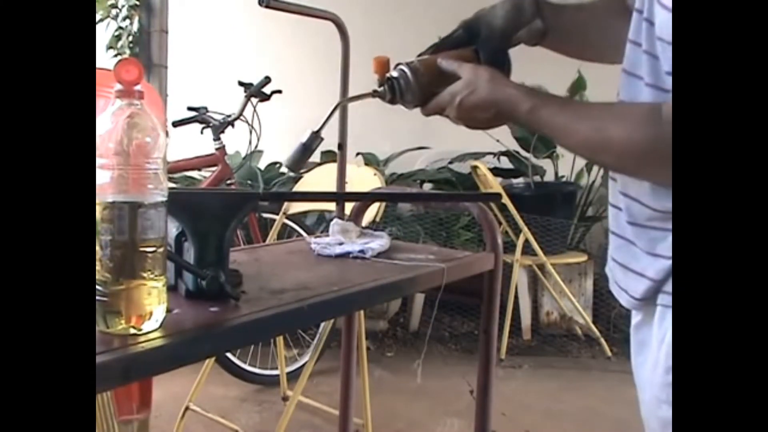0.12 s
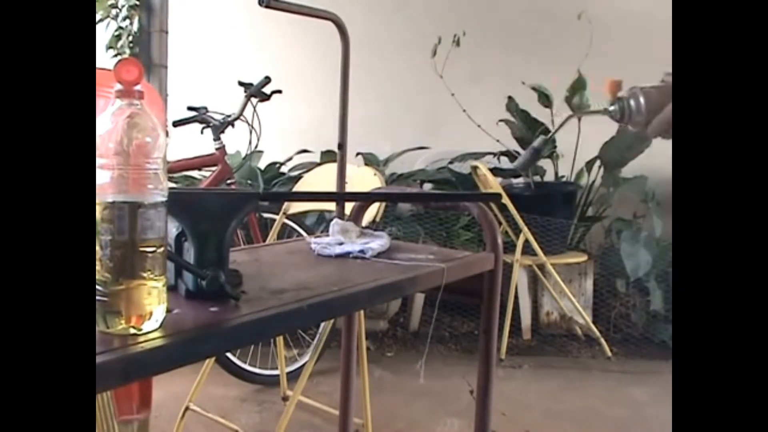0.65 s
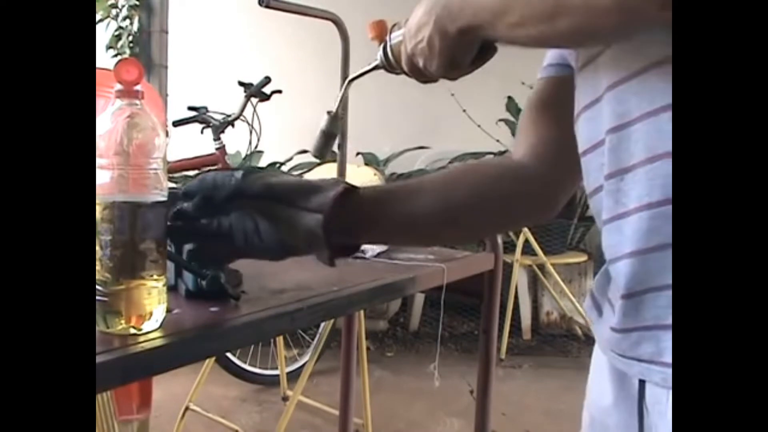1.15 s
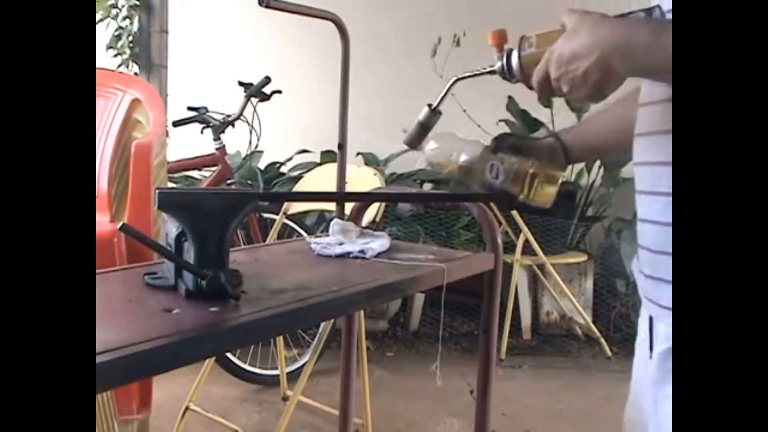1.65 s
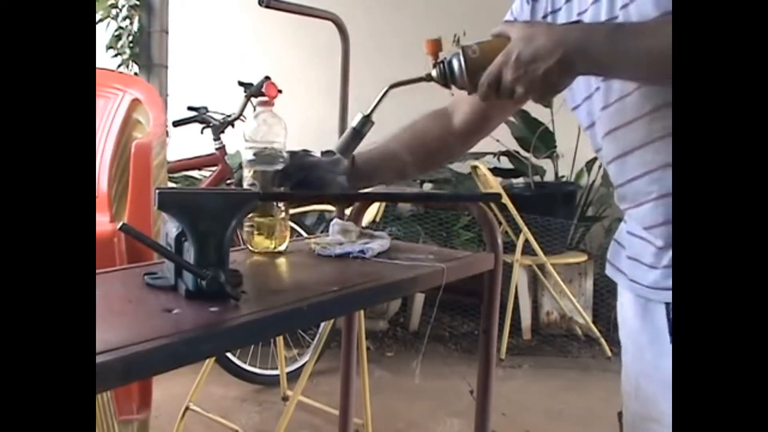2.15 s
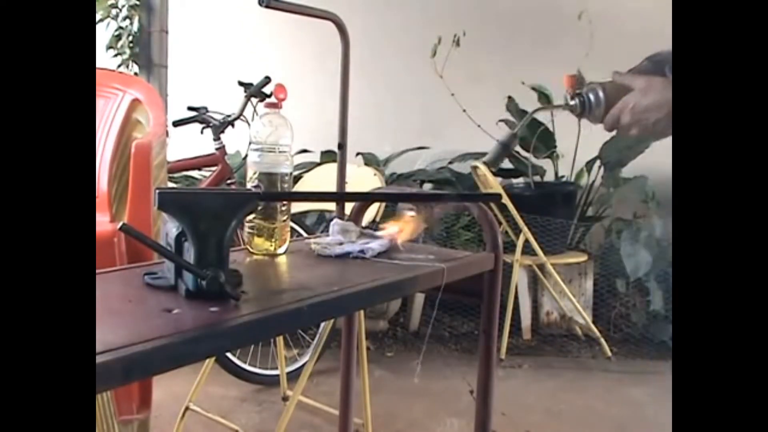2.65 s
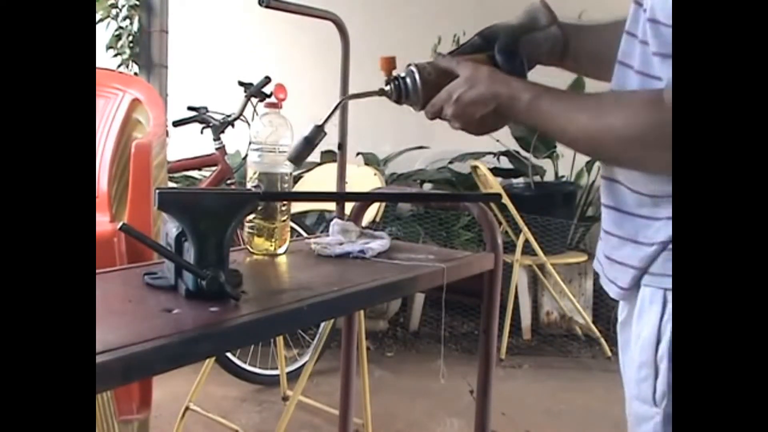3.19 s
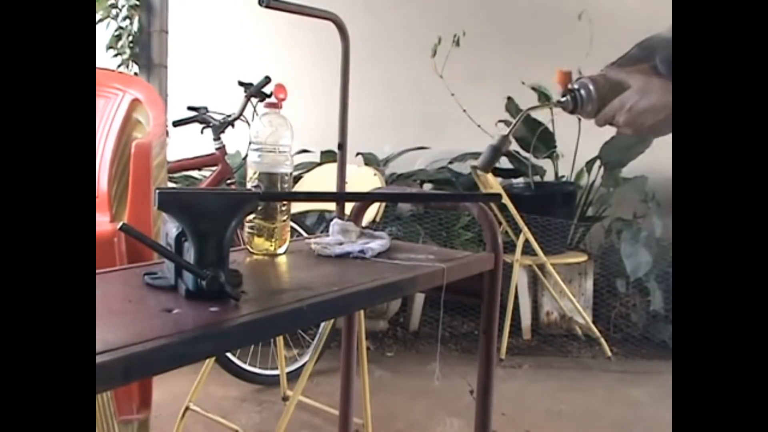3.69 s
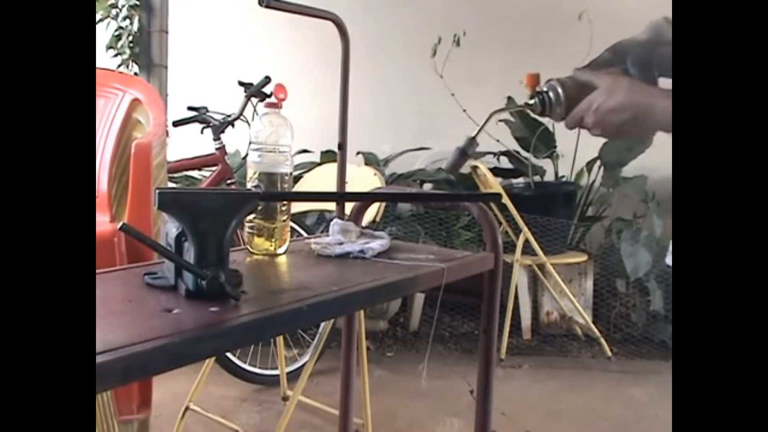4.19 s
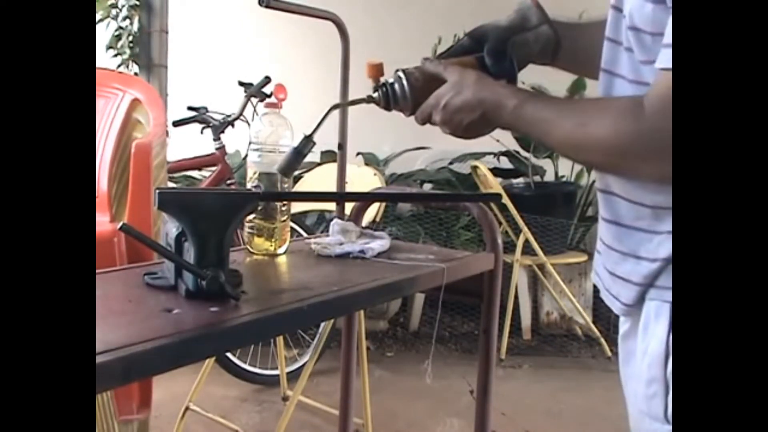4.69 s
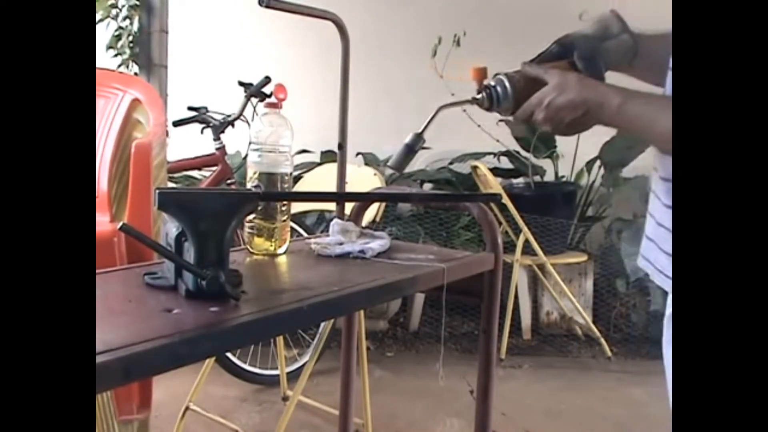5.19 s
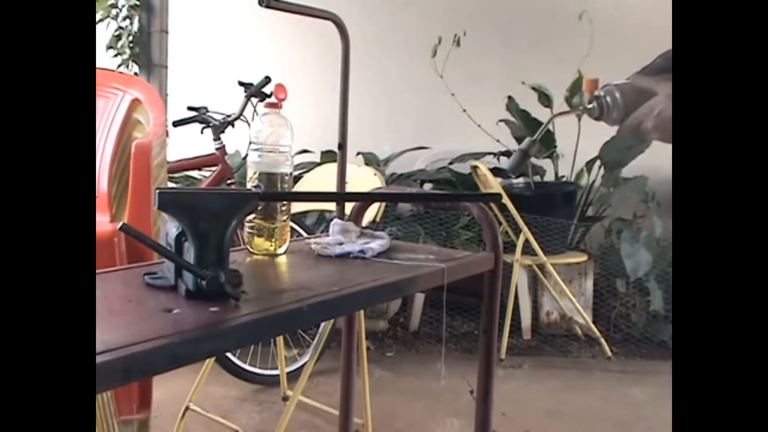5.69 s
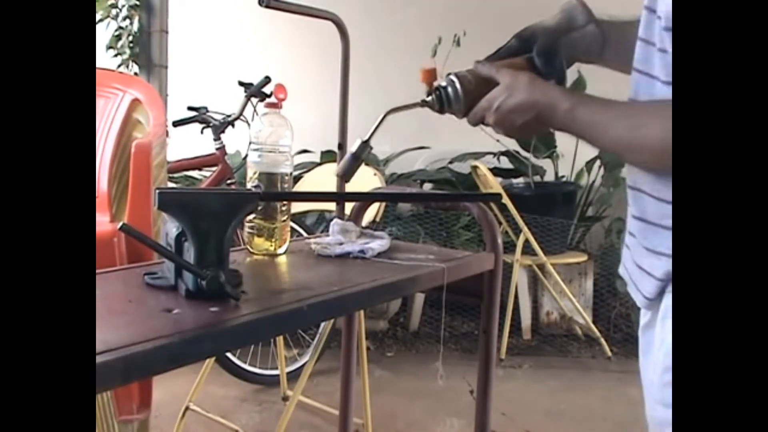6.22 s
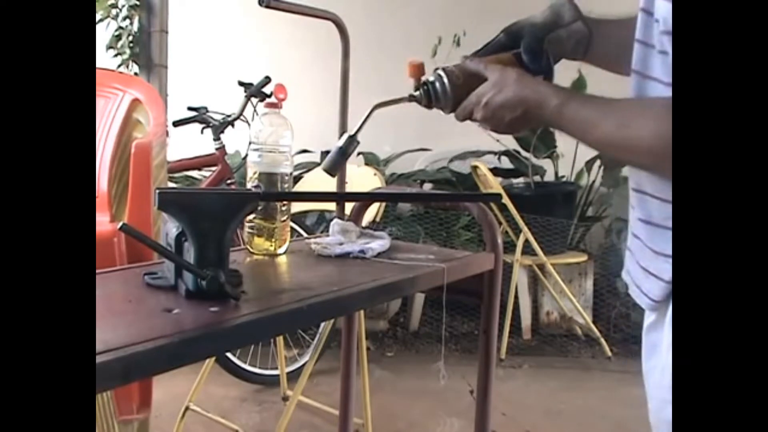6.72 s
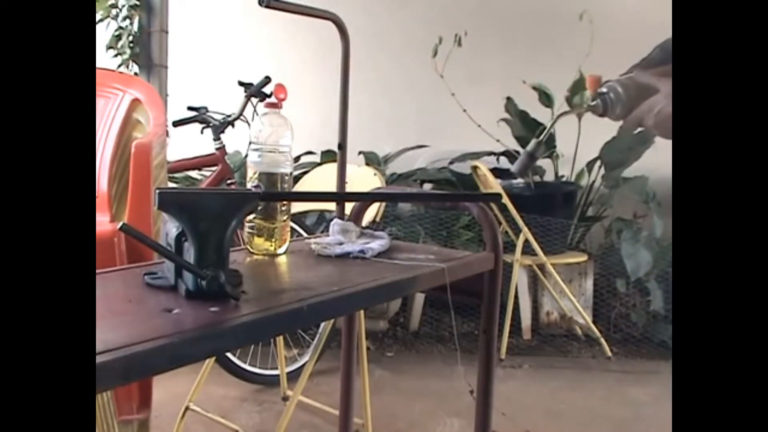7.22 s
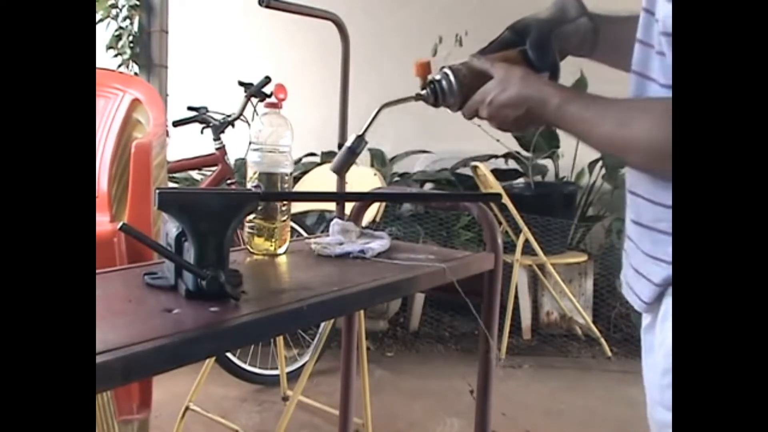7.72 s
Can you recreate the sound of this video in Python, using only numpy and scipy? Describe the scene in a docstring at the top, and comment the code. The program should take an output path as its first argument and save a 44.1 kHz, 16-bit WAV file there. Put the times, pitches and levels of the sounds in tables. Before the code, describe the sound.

Close, steady burner roar with a sliding, hollow whooshing colour, a few early flame puffs, faint passing traffic and a low rush at the end.

```python
"""A handheld gas torch roars and hisses, swept to and fro along a steel rod over a table on a covered porch.
The jet is turbulent noise combed by many short echoes whose delays slide with the hand. Early on the flame
sputters in soft low puffs, twice faltering, and an arm screens some echoes at 1.3 s; the flame flares at times.
From 3.5 s far motor tones hum over low traffic noise, and a vehicle passes near 5.3 s as swelling noise.
At the end the flame flares, gives a steady low whoosh of noise and sputters again."""
import sys
import numpy as np
from scipy import signal
from scipy.io import wavfile

SR = 44100
rng = np.random.default_rng(int(sys.argv[2]) if len(sys.argv) > 2 else 0)


def master(y):
    """Save y as 16-bit WAV."""
    cut = np.clip(np.atleast_2d(y).T, -1, 1)
    pcm = np.round(cut * 32767)  # scale
    wavfile.write(sys.argv[1], SR, pcm.astype(np.int16))


def boost_factor(decibels):
    """Convert a level in decibels to a linear amplitude factor."""
    exponent = np.asarray(decibels, float) / 20
    return 10 ** exponent


N = 346626   # samples


def rms_one(x):
    """Normalization: equal mean power gives every signal an rms of 1."""
    return x / np.sqrt(np.mean(x ** 2) + 1e-20)


def at_hz(points, hz):
    """Logarithmic frequency scale: a spectrum table is interpolated evenly per octave."""
    table_hz, value = np.array(points).T
    return np.interp(np.log(hz), np.log(table_hz), value)


def drift(rate_hz):
    """Low-pass filtered chance: white noise twice through one pole wanders slowly, with rms 1."""
    pole = np.exp(-2 * np.pi * rate_hz / SR)
    white = rng.standard_normal(N + SR)
    settled = signal.lfilter([1], [1, -2 * pole, pole * pole], white)[SR:]
    return rms_one(settled)


def band(x, low_hz, high_hz):
    """Band limitation: a Butterworth filter passes one range of frequencies."""
    return signal.sosfilt(signal.butter(2, [low_hz, high_hz], "band", fs=SR, output="sos"), x)


def low_noise(own_db, top_hz):
    """Partial coherence: both ports share one deep and one broad noise, each adding its own at own_db."""
    white = rng.standard_normal((2, 3, N))
    shared, own = white[:, :1], white[:, 1:]
    deep_white, broad_white = shared + boost_factor(own_db) * own
    deep = rms_one(band(band(deep_white, 99, 227), 85, 330))
    broad = rms_one(band(broad_white, 190, top_hz))
    return deep, broad


def motor_tones():
    """Periodic excitation: far motors give sine tones whose pitch glides and wobbles and whose level wavers."""
    # Each row: start and end in seconds, first and last frequency in Hz, middle level in dB.
    tones = [(3.5, 4.45, 231, 232, -47), (4.75, 5.8, 168, 201, -42.5), (5.403, 5.8, 204, 223, -41),
             (6.35, 7.0, 184, 191.5, -47.5)]
    s, out = np.arange(N) / SR, 0
    waver_db = 3.0 * drift(7.0)
    wobble = 1 + .012 * drift(12.0)
    for start, end, first_hz, last_hz, db in tones:
        hz = np.interp(s, [start, end], [first_hz, last_hz])
        phase = 2 * np.pi * np.cumsum(hz * wobble) / SR
        fade = np.clip(np.minimum(s - start, end - s) / 0.15, 0, 1)
        out = out + fade * boost_factor(db + waver_db) * np.sqrt(2) * np.sin(phase)
    return out


def traffic():
    """Spreading loss: a passing vehicle's noise swells and fades with distance over a steady far rumble."""
    s = np.arange(N) / SR
    deep, broad = low_noise(own_db=-13.0, top_hz=520)
    # each width is in seconds: nearest distance over speed
    engine = boost_factor(-39) / np.hypot(1, (s - 5.3) / .3)
    tyres = boost_factor(-33) / (1 + ((s - 5.58) / 0.36) ** 2)
    rumble = np.hypot(boost_factor(-56.5), engine)
    waver = boost_factor(1.5 * drift(3.6))
    return motor_tones() + rumble * waver * deep + tyres * broad


def whoosh():
    """Turbulent combustion noise: a low rush of the flame sets in quickly and holds."""
    onset_s, rise_s = 7.7, .03
    deep, broad = low_noise(own_db=0.0, top_hz=1300)
    rise = .5 + .5 * np.tanh((np.arange(N) / SR - onset_s) / rise_s)
    return rise * (boost_factor(-36) * deep + boost_factor(-27) * broad)


def sputters(cycles=1.53, breath_db=-7.5, breath_s=0.016):
    """Pulsed heat release: each sputter is a pressure puff, a few cycles long, inside a short low gust."""
    # Each row: start in seconds, strength in dB before envelope and filter, frequency in Hz.
    puff_rows = [(0.107, -27, 291), (1.245, -27, 223), (1.36, -19.5, 260), (1.392, -30, 231),
                 (1.424, -22, 231), (1.469, -27, 302), (1.83, -21.5, 280), (2.059, -23.5, 326),
                 (2.272, -23, 274), (2.34, -23, 226), (2.494, -19, 266), (2.518, -25, 250),
                 (2.673, -19, 218), (2.724, -18.5, 291), (3.307, -22, 290), (3.354, -23, 219),
                 (3.384, -20, 323), (7.695, -21, 270), (7.747, -17, 274), (7.79, -19, 244),
                 (7.843, -22, 256)]
    puffs, gusts = np.zeros(N + SR), np.zeros(N + SR)
    s = np.arange(SR // 10) / SR
    for at, db, hz in puff_rows:
        start = round(at * SR)
        age = s * hz / cycles
        envelope = age * np.exp(1 - age) ** 2
        puffs[start:][:len(s)] += boost_factor(db) * envelope * np.sin(2 * np.pi * hz * s)
        gusts[start:][:len(s)] += boost_factor(db + breath_db) * np.exp(-s / breath_s)
    breath = rms_one(band(band(rng.standard_normal(N), 180, 630), 145, 900))
    return band(puffs[:N], 194, 900) + gusts[:N] * breath


def hand(s):
    """Kinematics: cosine-eased strokes join the turning points, each rising in an arc between them."""
    # Each row: time in seconds, place along the rod from 0 near to 1 far, lift above the usual path (relative).
    turning_points = [(-0.2, 0.65, -0.2), (0.29, 0.02, -0.69), (0.76, 0.86, 0.21), (1.28, 0.079, -0.26),
                      (1.9, 0.63, 1.33), (2.32, 0.085, -0.16), (2.8, 0.87, -0.0017), (3.21, 0.19, -0.27),
                      (3.92, 0.92, -0.057), (4.78, 0.18, -0.72), (5.73, 0.91, -0.02), (6.55, 0.16, -0.78),
                      (7.25, 0.9, -0.0056), (7.85, 0.23, -0.57)]
    at, along, lift = np.transpose(turning_points)
    order = np.arange(len(at))
    stroke = np.interp(s, at, order)
    eased = np.floor(stroke) + .5 - .5 * np.cos(np.pi * (stroke % 1))
    arc = 0.57 * np.sin(np.pi * stroke) ** 2
    return np.interp(eased, order, along), np.interp(eased, order, lift) + arc


def clutter(count, strength):
    """Scattering: clutter returns faint treble echoes at random delays that slide far with the hand."""
    draw = rng.uniform(-1, 1, (count, 5))
    delay_ms = 5.5 + 4.5 * draw[:, 0]
    along_ms = .3 * draw[:, 1] + .2 * np.sign(draw[:, 1])
    lift_ms = .15 * draw[:, 2]
    signed_strength = strength * np.sign(draw[:, 3])
    best_hz = 8000 * 2 ** draw[:, 4]
    return np.c_[delay_ms, along_ms, lift_ms, signed_strength, best_hz]


def echo_sum(rows, hz, along, lift):
    """Comb filtering: delayed copies add by phase, with delays renewed from the hand every second frame."""
    spread_octaves = .6   # of the band that one surface reflects
    total = 0
    for delay_ms, along_ms, lift_ms, strength, best_hz in rows:
        path_ms = delay_ms + along_ms * along[::2] + lift_ms * lift[::2]
        cycles = np.outer(hz, path_ms) / 1000
        size = strength * np.exp(-.5 * (np.log2(hz / best_hz) / spread_octaves) ** 2)
        total = total + size[:, None] * np.exp(-2j * np.pi * cycles.astype(np.float32))
    return np.repeat(total, 2, axis=1)[:, :len(along)]


def reflections(hz, s, along, lift):
    """Multiple reflection: the exponential of the echo sum lets each echo be echoed again by the others."""
    # Echoes off table, rod, arms and walls. Each row: delay in ms, its change along the rod in ms,
    # its change per unit of lift in ms, signed strength before screening, frequency reflected best in Hz.
    surfaces = [(0.221, 0.2, -0.01, -0.16, 3200), (0.374, -0.037, -0.01, -0.1, 13000),
                (0.38, 0.063, 0.015, -0.12, 8500), (0.663, -0.087, 0.027, 0.25, 8500),
                (0.737, -0.062, 0.052, -0.07, 13000), (0.828, -0.1, 0.002, 0.11, 8500),
                (0.924, -0.225, 0.015, -0.28, 3200), (0.935, -0.15, 0.027, -0.07, 8500),
                (0.998, -0.037, 0.015, -0.08, 8500), (1.128, -0.4, 0.102, -0.14, 1800),
                (1.151, -0.037, -0.023, 0.15, 8500), (1.434, -0.062, -0.01, -0.16, 1800),
                (1.604, -0.05, -0.023, 0.08, 8500), (1.746, -0.025, -0.01, 0.12, 8500),
                (2.001, -0.087, 0.015, 0.11, 5500), (2.035, -0.237, 0.052, 0.11, 3200),
                (2.256, -0.05, 0.002, 0.36, 1800), (2.279, -0.062, -0.023, -0.12, 5500),
                (2.534, -0.137, 0.027, 0.09, 8500), (2.778, -0.162, 0.052, 0.13, 1800),
                (3.265, -0.012, 0.027, -0.12, 3200), (3.617, -0.3, 0.027, 0.09, 3200),
                (3.821, 0.113, -0.023, -0.15, 1800), (3.917, -0.4, -0.023, 0.21, 600),
                (4.541, -0.025, 0.015, -0.09, 3200), (4.921, -0.025, -0.01, 0.29, 1000),
                (6.117, -0.212, 0.027, -0.07, 5500), (6.587, -0.162, 0.002, -0.36, 1000),
                (7.55, 0.0, 0.0, 0.25, 520), (7.687, -0.125, -0.01, 0.11, 1800),
                (9.558, -0.325, -0.048, 0.14, 1000)]
    # an arm reaches across the table and screens a share of the echoes
    open_view = 1 - 0.19 * np.exp(-((s - 1.3) / 0.22) ** 4)
    rows = np.r_[surfaces, clutter(count=14, strength=.115)]
    echoes = np.exp(open_view * echo_sum(rows, hz, along, lift))
    # the hands shade part of the direct path, so the spectral hollows cut deeper
    shade = np.interp(along, [0, 1], [.15, .33])
    return echoes - shade


def flame_db(s, along):
    """Superposed level changes: pressure, distance and flares add in dB to roar, hiss and sizzle."""
    # The next four tables hold one value each for roar, hiss and sizzle.
    # Level in dB at the start, at mid-rod and without a flare.
    base_db = [-16, -17.5, -14.5]
    # Slow trend in dB per second as the canister's pressure falls.
    pressure_db_per_s = [0.08, 0.0841, -0.34]
    # Change in dB from the near to the far end of the sweep.
    distance_db = [-0.2, -1.5, 0.5]
    # Change in dB in a flare of strength 1: the roar grows and the sizzle sinks.
    full_flare_db = [1.55, 0.1, -2]
    # Each row: middle of a flare in seconds, strength (relative), half length in seconds.
    flare_rows = [(1.14, 1.0, .1), (1.42, 1.1, 0.099), (2.3, 0.36, 0.18), (3.17, 0.61, 0.11), (6.3, .9, .2),
                  (7.338, 1.4, 0.11), (7.754, 1.4, 0.11)]
    flare = sum(size * np.exp(-((s - at) / half) ** 2) for at, size, half in flare_rows)
    trend = np.outer(pressure_db_per_s, s) + np.outer(distance_db, along - .5)
    return np.c_[base_db] + trend + np.outer(full_flare_db, flare)


def flame_gain(hz, s, along, power):
    """Band power control: gains bring roar, hiss and sizzle to their levels, blended across frequency."""
    # Each row: lower and upper edge in Hz, for roar, hiss and sizzle.
    flame_ranges = [(600, 2200), (2500, 7000), (9000, 15500)]
    short_db = []
    for db, (low, high) in zip(flame_db(s, along), flame_ranges):
        band_power = power[(hz > low) & (hz < high)].sum(axis=0)
        short_db.append(db - 10 * np.log10(band_power))
    centres_hz = np.sqrt(np.prod(flame_ranges, axis=1))
    share = [at_hz(list(zip(centres_hz, row)), hz) for row in np.eye(len(flame_ranges))]
    return boost_factor(np.transpose(share) @ short_db)


def port_balance(hz, along, far_pan_db=-2.5):
    """Interaural-style cues: level and phase differences, returned as half of the left-to-right ratio."""
    # Each row: frequency in Hz, left minus right level in dB at mid-rod.
    balance = [(30, -5), (60, -2), (150, 1), (380, 1.5), (950, 0), (2380, -4), (5980, -3.0), (15000, -3.0)]
    # Each row: frequency in Hz, phase in radians by which the left leads.
    phase_lead = [(0, 0), (690, -0.63), (1290, -0.78), (3190, -0.95), (5170, -0.24), (5860, -0.44),
                  (7240, -0.8), (15300, -0.2)]
    # above 1500 Hz the jet moves to the right towards the far end of the sweep
    pan_db = at_hz(balance, hz)[:, None] + far_pan_db * (along - .5) * (hz[:, None] > 1500)
    return boost_factor(pan_db / 2) * np.exp(.5j * at_hz(phase_lead, hz))[:, None]


def jet():
    """Turbulent mixing noise, coloured frame by frame: one direct sound in both ports, a diffuse part in each."""
    # Each row: frequency in Hz, relative level in dB per Hz before the flame gains.
    jet_colour = [(25, -32), (60, -32.5), (110, -33), (150, -28), (250, -12.5), (360, -9.5), (450, -17),
                  (600, -7), (800, -3), (1200, -1), (1900, -.5), (2200, -6), (3300, -7), (4600, -3.5),
                  (5200, -7.5), (6000, -12.5), (8000, -10.5), (10000, -13.5), (12000, -6.5), (13800, -2),
                  (15500, -13)]
    # Each row: frequency in Hz, diffuse level in dB against the direct sound where the echoes have gain 1.
    diffuse_db = [(50, -3), (125, -11), (250, -12), (450, -15), (700, -14), (1200, -5), (2500, -11),
                  (6000, -13), (14000, -14)]
    frame, hop = 2048, 512   # samples
    noise = rng.standard_normal((3, N))
    hz, s, (direct, *diffuse) = signal.stft(noise, SR, nperseg=frame, noverlap=frame - hop)
    hz[0] = 1   # keeps the logarithm finite
    along, lift = hand(s)
    echoes = reflections(hz, s, along, lift)
    colour = boost_factor(at_hz(jet_colour, hz))[:, None]
    spread = boost_factor(at_hz(diffuse_db, hz))[:, None] * np.abs(echoes) ** 0.73
    power = colour ** 2 * (np.abs(echoes) ** 2 + spread ** 2 / 2) * 2 / frame
    colour = colour * flame_gain(hz, s, along, power)
    half = port_balance(hz, along)
    ports = []
    for side, own in zip((half, 1 / half), diffuse):
        own_clutter = np.exp(echo_sum(clutter(count=6, strength=.12), hz, along, lift))
        ports.append(colour * side * (echoes * own_clutter * direct + spread * own))
    return signal.istft(np.array(ports), SR, nperseg=frame, noverlap=frame - hop)[1][:, :N]


def unsteady_flow(slow_db=0.34, fast_db=.5):
    """Amplitude modulation: the gas flow flutters a little and falters for a few milliseconds at times."""
    # Each row: middle in seconds, level change in dB, half length in seconds.
    dips = [(1.137, -3, .005), (1.379, -5.5, .007)]
    s = np.arange(N) / SR
    dips_db = sum(db * np.exp(-((s - at) / half) ** 4) for at, db, half in dips)
    return boost_factor(slow_db * drift(12.3) + fast_db * drift(27.0) + dips_db)


def scene():
    """Linear superposition of jet, sputters and low sounds; the last two lean a little to the left."""
    low = (traffic() + whoosh()) * boost_factor(np.array([[.8], [-.8]]))
    puffs = sputters() * boost_factor(np.array([[1.3], [-1.3]]))
    return jet() * unsteady_flow() + puffs + low


def top_cut(x):
    """Nothing passes above the cut-off."""
    return signal.sosfilt(signal.butter(12, 15740, fs=SR, output="sos"), x)


def record(dry):
    """Overload: peaks beyond full scale are clipped."""
    mix = np.clip(dry, -1, 1)
    return top_cut(mix)


dry = scene()
out = record(dry)
master(out)
```